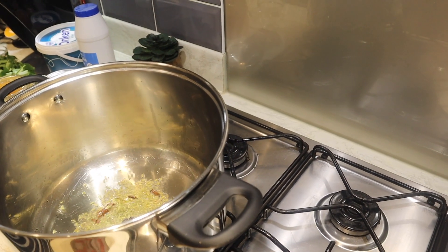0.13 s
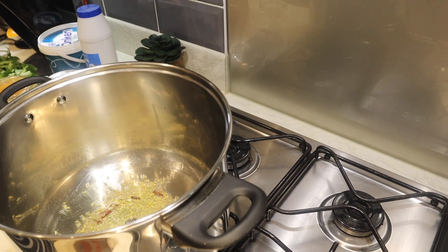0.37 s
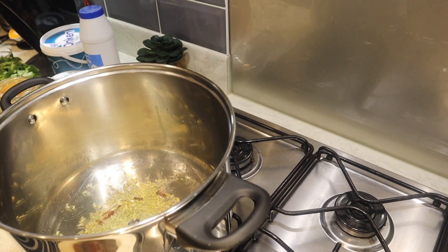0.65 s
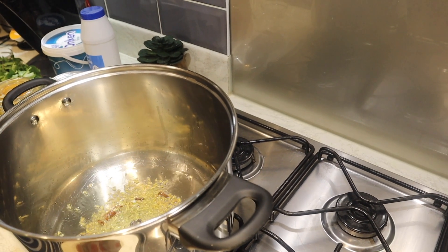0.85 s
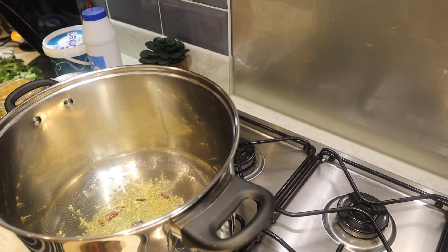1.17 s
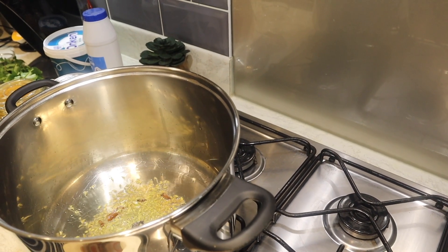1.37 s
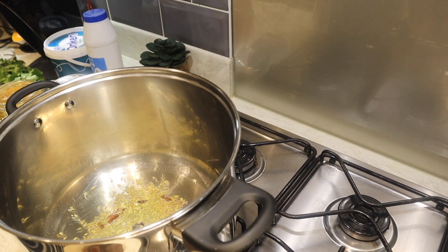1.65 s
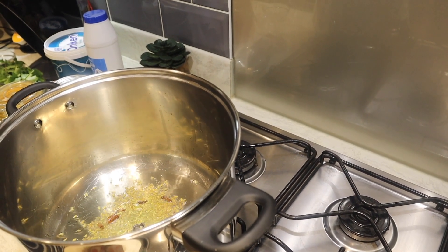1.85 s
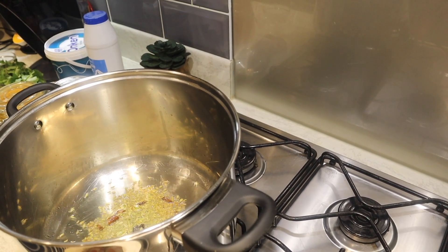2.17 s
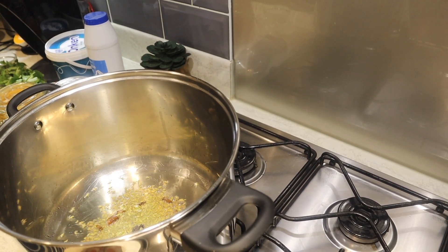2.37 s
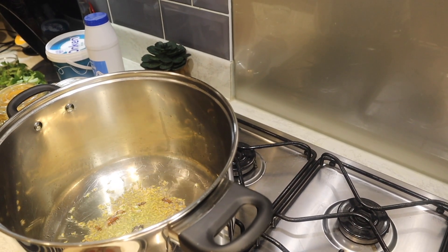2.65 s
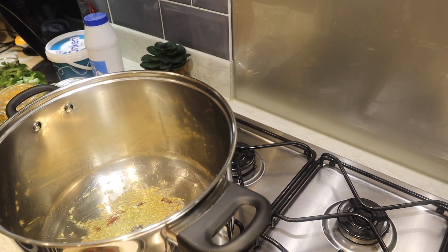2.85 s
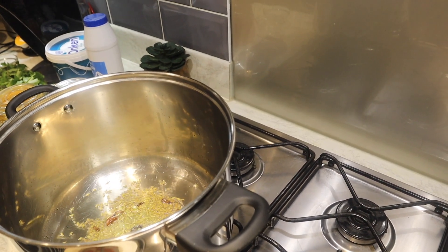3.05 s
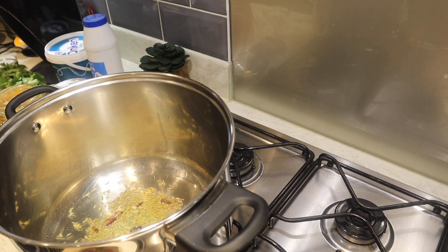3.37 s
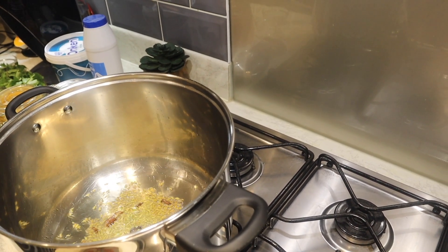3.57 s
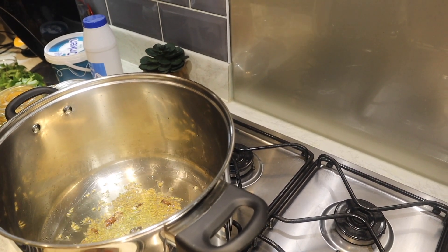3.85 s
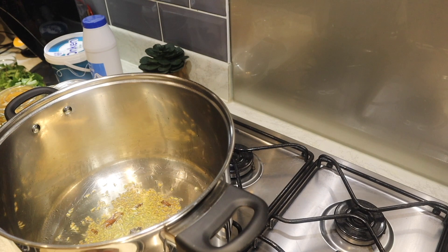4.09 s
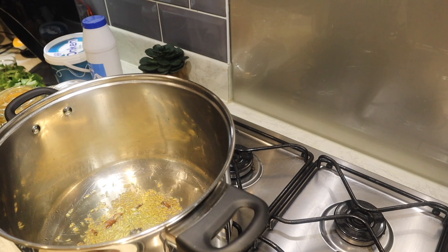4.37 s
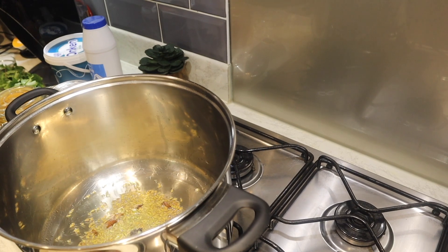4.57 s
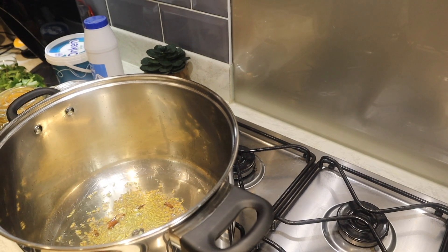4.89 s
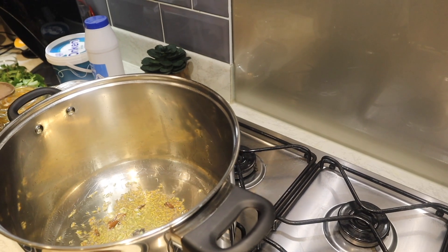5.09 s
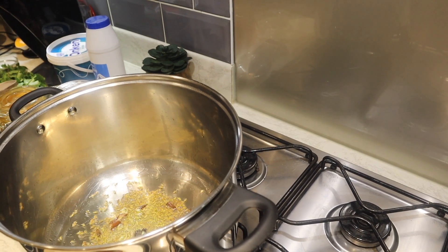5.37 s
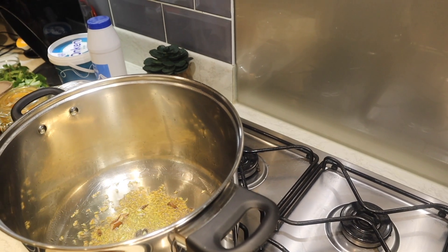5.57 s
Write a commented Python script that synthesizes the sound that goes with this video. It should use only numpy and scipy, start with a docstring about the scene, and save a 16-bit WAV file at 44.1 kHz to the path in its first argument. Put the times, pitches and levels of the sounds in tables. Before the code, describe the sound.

Close stereo capture of spices frying in a large steel pot: sharp bright snaps and softer bubble pops come irregularly throughout, over a thin sizzle and very low burner rush. Faint bumps occur in the first half second; after about four and a half seconds a metal object clinks, scuffs and knocks on the worktop. The home kitchen adds only a short tail.

```python
"""Hot oil sizzles finely over a burner's low rush, then steam bubbles pop and whole spices crackle in a steel pot.
Each burst is a snap of shaped noise with a puff of pressure; its ring is fading noise through the pot's resonances.
Faint scuffs and bumps come early; near the end a metal thing clinks and slides on the worktop.
Slides are gritty noise, clinks are dying sine modes and bumps are sagging tones with clatter.
A short kitchen tail surrounds it all but sizzle and burner; a close pair of microphone ports sets the stereo."""
import sys
import numpy as np
from scipy import signal
from scipy.fft import rfft, irfft, next_fast_len
from scipy.io import wavfile
from scipy.ndimage import uniform_filter1d

SR = 44100
rng = np.random.default_rng(int(sys.argv[2]) if len(sys.argv) > 2 else 0)


def to_wav(sig):
    """Store sig (one row per channel, or 1-D mono) as 16-bit WAV at the path in sys.argv[1].

    Samples outside -1..1 are clipped; the rate is SR.
    """
    pcm = np.clip(np.atleast_2d(sig), -1, 1) * 32767
    pcm = np.round(pcm).astype(np.int16)
    wavfile.write(sys.argv[1], SR, pcm.T)  # frames by channels


N = 252693

# seeds cracking open: (t/s, relative snap level/dB, f/Hz of the lifted pitch,
#                       pot ring relative to the snap/dB, relative puff level/dB)
CRACKS = [(0.122, -31, 12200, 7, -62), (0.1656, -22, 13000, -1, -57), (0.179, -17, 13300, -5.5, -35),
          (0.3012, -25.5, 13200, 7.5, -38.5), (0.504, -18, 6900, -17, -58),
          (0.5631, -6.5, 8300, -4.5, -27.5), (0.5907, -10.5, 9400, -9, -47), (0.6195, -8, 5950, -17, -17.5),
          (0.889, -10.5, 11500, -6.5, -31), (1.1193, -17, 13700, -6.5, -58),
          (1.146, -12.5, 12700, -28, -30.5), (1.331, -16, 14000, -7.5, -41), (1.375, -20, 13800, -4, -45),
          (1.5155, -17.5, 1360, -29, -27), (1.9085, -10.5, 14400, -1, -32),
          (1.9564, -9.5, 3920, -16.5, -16), (2.153, -30, 13200, 1.5, -40), (2.261, -20.5, 13300, 0.5, -51),
          (2.319, -18.5, 10900, -6, -53), (2.324, -14.5, 12400, -19, -29.5), (2.4, -26.5, 7900, -2, -48),
          (2.4242, -20.5, 7400, -10, -41), (2.454, -23, 12500, 4.5, -53), (2.563, -3, 10300, -12.5, -16),
          (2.5826, -17, 13000, -28, -17), (2.6063, -18.5, 1960, -12, -30), (2.8182, -32, 11700, -2, -55),
          (2.8697, -15.5, 12700, -27, -64), (2.962, -10, 5700, -23, -13), (3.036, -16.5, 10700, 1, -58),
          (3.1663, -23, 9100, -3, -66), (3.425, -33.5, 13000, 2.5, -41.5), (3.8114, -24, 13500, 2, -53),
          (4.1873, -14.5, 10800, -4.5, -49), (4.2368, -19.5, 12800, -2.5, -38),
          (4.5026, -14, 12700, 4.5, -28), (4.734, -30, 13000, 9.5, -37), (4.8407, -10.5, 11300, -2, -59),
          (4.942, -22.5, 13100, 4.5, -57), (5.045, -12.5, 14500, 0, -26.5), (5.1135, -15, 11700, -14, -42),
          (5.1151, -5.5, 11500, -15, -17.5), (5.2537, -12, 3270, -4.5, -23),
          (5.4679, -15, 12800, -3.5, -53), (5.664, -20.5, 9100, 6, -37), (5.7177, -14, 13000, -0.5, -22.5)]
# steam bubbles bursting in the oil: (t/s, relative snap level/dB, pitch f/Hz, lift at that pitch/dB,
#                                     pot ring relative to the snap/dB)
BUBBLES = [(0.0455, -32, 3220, 30, 2.5), (0.06, -27.5, 8850, 25, 1), (0.23, -14.5, 3780, 12, -3.5),
           (0.2459, -18.5, 3630, 21, -0.5), (0.4612, -27, 2320, 1, -1), (0.477, -24, 2030, 4.5, -0.5),
           (0.7496, -37, 3270, -7, 2), (0.7612, -27.5, 3400, 20, -1), (0.7765, -25.5, 4970, 20, 6.5),
           (0.8214, -24.5, 3700, 9, 3), (0.8612, -30.5, 8000, 12, 10), (0.8686, -15, 3750, 13, -9.5),
           (0.9306, -20.5, 8260, 15, -3), (0.9547, -21.5, 3100, 5, -3), (1.035, -34.5, 3050, -4, 7),
           (1.0554, -21.5, 2450, 5.5, 1), (1.0826, -35, 10000, 17, -1), (1.1679, -30, 3080, 1, 3.5),
           (1.2359, -25.5, 2400, 4, 0.5), (1.2529, -14.5, 3640, 13, 1.5), (1.2579, -12, 4800, 15.5, -3),
           (1.3038, -27, 6600, -2.5, 2.5), (1.309, -15, 5860, 31, -9), (1.4158, -21.5, 6950, 4, 4),
           (1.427, -8.5, 3860, 18.5, -17), (1.4657, -30, 7540, 8, 3.5), (1.497, -35, 4800, 19, 8),
           (1.522, -27.5, 3920, 9, 4.5), (1.5905, -22, 3670, 16, 0), (1.6032, -25, 5740, 15, 1),
           (1.6266, -21.5, 6760, 12, -4), (1.6792, -22.5, 7500, 34, -10), (1.757, -35, 7060, 32, 0),
           (1.791, -39, 3270, 2, 1), (1.803, -36, 6370, 7, 9), (1.8157, -25, 5150, 3.5, 8),
           (1.87, -25, 2000, 0, 1), (1.8896, -25.5, 4770, 10, 1), (1.931, -24, 2330, 37, -21),
           (2.023, -20, 2350, 5.5, -4), (2.0522, -28, 3650, 24, 3.5), (2.065, -34, 3420, 1, 11.5),
           (2.1921, -20, 4070, 17, -18), (2.2391, -22.5, 2580, 1.5, 3), (2.3148, -35, 3300, -9, 9),
           (2.5145, -32.5, 4300, 6, 2.5), (2.5425, -21.5, 3080, 3, 3), (2.615, -25, 3100, 45, 0.5),
           (2.6963, -23.5, 7060, 19, -3.5), (2.7215, -28.5, 3120, 3, -3), (2.738, -39, 3420, -4, 4),
           (2.8512, -35.5, 2000, -2, 10), (2.92, -26.5, 9500, 15, -11), (2.9956, -14, 3250, 11.5, -2),
           (3.058, -19.5, 3700, 23, -1.5), (3.109, -30.5, 4460, 14, 9.5), (3.2822, -19.5, 4650, 11.5, -0.5),
           (3.2947, -22, 5500, 8, -1.5), (3.3223, -25, 1990, 1.5, 0.5), (3.486, -32, 4300, 18, 4.5),
           (3.52, -33, 2090, 6, 8.5), (3.556, -37, 2760, -1, 6), (3.578, -28.5, 5200, 13, 6.5),
           (3.6292, -39, 5000, 5, 4), (3.637, -12, 4360, 11, -5), (3.6475, -23, 6150, -9, -0.5),
           (3.6533, -18, 5260, 17, 2), (3.8235, -26.5, 5650, 8, 3), (3.8947, -35.5, 6900, 6, 0),
           (3.958, -33, 10000, 17, 0), (4.0065, -31, 2330, 6, 4), (4.042, -22, 5000, 7.5, -3),
           (4.0689, -20.5, 1910, 5, 0.5), (4.1023, -16.5, 8600, 8.5, -2.5), (4.1751, -31, 2930, -11, 1),
           (4.3116, -20.5, 5440, 14, 1.5), (4.3312, -20, 2070, -5.5, 5), (4.3435, -25, 5100, 17, -1),
           (4.4493, -26.5, 6600, 11, 7), (4.778, -23.5, 2000, 3, -0.5), (4.8096, -22, 4400, -1, -19),
           (4.8205, -32, 4480, 34, 3), (4.8967, -32, 8500, 24, 5), (4.9535, -22.5, 3400, 9, 7),
           (4.972, -26.5, 4870, 20, 7.5), (4.995, -13, 4760, 15, -1), (5.0832, -17, 1980, 4.5, 3),
           (5.2134, -28, 3160, 11, 6), (5.3361, -22.5, 3350, 9, 4), (5.378, -22.5, 6900, 11, -5),
           (5.409, -20.5, 4330, 16, 2.5), (5.5017, -26.5, 3910, 6, 3), (5.518, -25, 1990, 6, -0.5),
           (5.4621, -27, 8440, 6, -1), (5.5484, -20, 7300, 5, -4.5), (5.5735, -33.5, 3400, 1, 8.5),
           (5.5984, -24, 3360, 13.5, 9.5), (5.6256, -33, 5170, -4, 5), (5.695, -15.5, 3650, 16.5, 4.5)]
# spectrum of a snap before its pitch is lifted: (f/Hz, relative level/dB)
SNAP_SPECTRUM = [(100, -24), (400, -27), (900, -1.5), (1250, -9), (2000, -3), (3000, 2), (4200, 3),
                 (6000, 1), (8700, 2.5), (11300, 6), (12700, 4), (14000, -5.5), (16000, 1)]
# spectrum of the ring before the pot's resonances: (f/Hz, relative level/dB)
RING_SPECTRUM = [(100, -38), (220, -23.5), (400, -17), (700, -13), (1300, -15), (2000, -6.5), (3000, 1.5),
                 (4200, -2), (6000, 2.5), (8700, -1.5), (11300, 4.5), (12700, -2), (14000, -14),
                 (16000, -50)]
# resonances of the steel pot: (f/Hz, width/Hz, lift/dB)
POT_MODES = [(355.4, 91, 15.5), (411.6, 74, 16), (952, 46, 22.5), (1488, 76, 18.5), (1792, 144, 13.5),
             (2305, 110, 6.5), (3990, 130, 3.5)]
# strokes of things over the worktop: (t/s, relative level/dB, hold/s, decay time constant/s,
#                                      brightness above 1 kHz/dB per octave)
SLIDES = [(0.454, -48, 0.03, .012, -1), (2.109, -50.5, 0.047, 0.034, -13.5),
          (2.854, -47.5, 0.015, 0.043, -7), (3.189, -48.5, 0.072, 0.034, -1),
          (4.421, -37.5, 0.015, 0.029, -4), (4.513, -32.5, 0.027, 0.016, 0),
          (4.531, -27, 0.015, 0.02, -1.5), (4.776, -37, 0.014, 0.031, -4), (4.948, -36, 0.016, 0.023, -24),
          (5.158, -22.5, 0.012, 0.031, 1.5), (5.211, -29, 0.014, 0.034, -2)]
# spectrum of rubbing: (f/Hz, relative level/dB)
SLIDE_SPECTRUM = [(80, -34), (250, -9), (700, -13.5), (1200, -2), (2200, -0.5), (3400, 4), (5000, -2),
                  (7000, -7), (10000, -9), (15000, -23)]
# resonances of the slid thing: (f/Hz, width/Hz, lift/dB)
SLID_THING_MODES = [(844, 120, 8.7), (1210, 59, 7.4), (1310, 76, 10.4), (1790, 120, 9), (2260, 150, 9.7),
                    (2450, 70, 11), (3306, 41, 12), (4240, 66, 6.1), (4970, 59, 12), (6100, 340, 8.5),
                    (7180, 86, 10), (9000, 72, 23)]
# the metal thing touching: (t/s, relative level/dB, brightness/dB per octave)
CLINKS = [(4.423, -33, -5), (4.537, -25, -2), (4.953, -24, -9), (5.162, -21, -2), (5.181, -31, 3.5),
          (5.219, -40, 8)]
# its struck modes: (f/Hz, level before brightness/dB, t60/s)
CLINK_MODES = [(956, -16, 0.21), (1166, -16.5, 0.24), (1740, -5, 0.17), (2200, -2, 0.081),
               (2243, -1, 0.065), (3280, -2.5, 0.23), (4177, -14, 0.12), (4960, -13, 0.17),
               (6040, -18, 0.08), (7070, -19, 0.08), (8830, -11, 0.11)]
# dull bumps: (t/s, relative level/dB, starting f/Hz, length/s, decay time constant/s, share of clatter 0-1)
BUMPS = [(0.372, -47.5, 124, 0.034, 0.016, 0.24), (0.414, -47, 82.5, 0.032, 0.025, 0.6),
         (0.474, -40.5, 134, 0.035, 0.012, 0.14), (0.514, -43.5, 127, 0.031, 0.019, 0.4),
         (4.57, -38.5, 209, 0.0099, 0.039, 0.86), (4.622, -44.5, 240, 0.011, 0.017, 0.9),
         (4.672, -45.5, 184, 0.014, 0.039, 0.67), (4.744, -32.5, 197, 0.024, 0.011, 0.28),
         (4.774, -39.5, 89, 0.017, 0.063, 0.94), (4.955, -41, 229, 0.032, 0.048, 0.99),
         (4.993, -41.5, 188, 0.055, 0.028, 0.96), (5.232, -28, 150, 0.011, 0.021, 1),
         (5.249, -28, 138, 0.0095, 0.043, 0.96)]
# spectrum of the clatter in a bump: (f/Hz, relative level/dB)
CLATTER_SPECTRUM = [(60, -6), (130, 3), (450, 2.5), (900, 4.5), (1500, -3.5), (3000, -4), (8000, -40)]
# resonances of the knocked worktop: (f/Hz, width/Hz, lift/dB)
WORKTOP_MODES = [(263, 34, 4), (398, 45, 12.5), (675, 33, 3.5), (896, 85, 6), (1180, 47, 6.5),
                 (1600, 80, 6), (1986, 72, 8)]
# spectrum of the fine sizzle: (f/Hz, relative level/dB)
SIZZLE_SPECTRUM = [(1000, -0.5), (1400, 2), (2000, 1), (3200, 11.5), (4500, 10), (6500, 11.5), (8500, 6.5),
                   (11000, 9), (12300, 9), (14000, 0), (16000, -49)]
# how hard the oil sizzles: (t/s, relative level/dB)
HEAT = [(0.0, -36), (0.12, -39.5), (0.8, -39.5), (1.1, -40), (1.4, -45), (1.9, -39.5), (2.6, -43.5),
        (2.8, -45.5), (3.2, -45.5), (3.45, -44), (3.61, -36.5), (3.76, -44.5), (3.95, -42), (4.4, -40.5),
        (4.9, -37.5), (5.25, -50), (5.45, -37), (5.73, -35.5)]
# spectrum of the burner's rush: (f/Hz, relative level/dB)
BURNER_SPECTRUM = [(25, 2), (70, 5), (130, 5.5), (230, -2), (380, 1.5), (600, -5), (950, 4.5), (1300, -1.5),
                   (2500, 3), (5000, -30), (12000, -23), (16000, -60)]
# decay of the kitchen's tail: (f/Hz, t60/s)
KITCHEN_DECAY = [(100, 0.037), (1000, 0.066), (5000, 0.22), (14000, 0.0065)]
# phase between the ports: (f/Hz, lead of the left/rad)
PORT_PHASE = [(100, 0.5), (400, 0.72), (1000, 0.52), (1800, 0.2), (2500, 1.74), (4300, 2), (7000, 4),
              (9500, 4), (16000, 3.5)]
# likeness of the two ports: (f/Hz, likeness 0-1)
PORT_LIKENESS = [(25, 1), (90, 1), (300, 1), (700, 0.98), (1500, 0.25), (3000, 0.97), (6000, 0.41),
                 (9000, 1), (13000, 1)]
# balance of the ports: (f/Hz, left minus right level/dB)
PORT_BALANCE = [(60, -0.5), (400, 0.34), (1000, 1.4), (2000, -1.5), (4000, 1.5), (8000, 1.1),
                (13000, -0.43)]

LEAD_S = 58 / SR  # a snap's sound starts this far ahead of its listed time
WALL_S, WALL_DB = 0.0019, -17  # base delay and level of the pot-wall echoes, both varied per echo
BUBBLE_PUSH_DB = -30  # a bubble's puff relative to its snap, before the port gains
EDGE_HZ = 16100  # top of the recorded band


def cracks(tone_db=7.0, burst_s=0.00012):
    """Seeds split with a dry, broad snap and a puff of steam."""
    out = np.zeros((2, N))
    for s, snap_db, hz, ring_db, push_db in CRACKS:
        add(out, s - LEAD_S, pop(snap_db, hz, tone_db, ring_db, burst_s))
        add(out, s, push(push_db))
    return out


def bubbles(cycles=1.55, puff_s=0.0009):
    """Steam bubbles burst: the lower the pitch, the longer the burst takes to die."""
    out = np.zeros((2, N))
    for s, snap_db, hz, tone_db, ring_db in BUBBLES:
        add(out, s - LEAD_S, pop(snap_db, hz, tone_db, ring_db, burst_s=cycles / hz))
        add(out, s, push(snap_db + BUBBLE_PUSH_DB, puff_s))
    return out


def pop(snap_db, hz, tone_db, ring_db, burst_s, octaves=0.8, ring_tone=0.99, fast_t60=0.039,
        slow_t60=0.18, slow_db=-7, top_hz=11500, top_db=14, echo_db=2.0):
    """A seed or bubble bursts in a brief snap, which then bounces around in the pot."""
    def pitch_lift(f):
        """Lifts the burst's pitch; lower-pitched bursts lose more of the very top."""
        lowness = np.clip(1 - hz / top_hz, 0, 1)
        top_cut = top_db * lowness * np.clip(f / top_hz - 1, 0, 1) * 4
        return tone_db * np.exp(-(np.log2((f + 1) / hz) / octaves) ** 2) - top_cut

    # snap: the phases of a dying noise burst on a designed spectrum
    f, t = bins(size=512), np.arange(512) / SR
    bursts = np.roll(rng.standard_normal((2, len(t))) * np.exp(-t / burst_s), 64, axis=1)
    snap_spectra = amp(read(SNAP_SPECTRUM, f) + pitch_lift(f)) * np.exp(1j * np.angle(rfft(bursts)))
    snap = unit(ports(*snap_spectra))

    # ring: begins 80 samples in and fades at two speeds
    f, t = bins(size=4096), np.maximum(np.arange(4096) - 80, 0) / SR
    fade = 1000 ** (-t / fast_t60) + amp(slow_db) * 1000 ** (-t / slow_t60)
    fade = fade * (1 - np.exp(-t * SR / 16))
    fade = fade * amp(echo_db * wobble(len(t), size=30))  # wall echoes arrive in clumps
    pot_db = lifts(varied(POT_MODES, shift=0.021, uneven_db=3.5), f)
    ring_colour_db = read(RING_SPECTRUM, f) + pot_db + ring_tone * pitch_lift(f)
    sound = amp(ring_db) * unit(noise(ring_colour_db) * fade)

    for delay, size in rng.random((3, 2)):  # the nearest walls return the snap itself
        add(sound, WALL_S * (.5 + 2 * delay), amp(WALL_DB) * (.5 + size) * snap)
    add(sound, 0, snap)
    return amp(snap_db) * np.sqrt(SR / 500) * sound


def push(db, width_s=0.00048, rise_s=0.000097, left_db=19, right_db=13):
    """The puff of steam from a burst: a quick rise of pressure and a shallow undershoot."""
    t = np.arange(SR // 80) / SR
    swing = np.gradient(t * np.exp(-t / width_s) * (1 - np.exp(-t / rise_s)))
    return amp(db) * unit(swing) * amp([[left_db], [right_db]])


def slides(rise_s=0.00066):
    """Things catch and slip over the worktop in gritty noise; the metal thing clinks where it touches."""
    out = np.zeros((2, N))
    f, t = bins(size=16384), np.arange(16384) / SR
    rise = 1 - np.exp(-t / rise_s)
    for s, db, length, dying, bright in SLIDES:
        stroke = rise * np.exp(-np.maximum(t - length, 0) / dying)
        body_db = lifts(varied(SLID_THING_MODES, shift=0.01, uneven_db=5.5), f)
        tilt_db = bright * np.log2(np.maximum(f, 1000))
        rub = grit(len(t)) * noise(read(SLIDE_SPECTRUM, f) + body_db + tilt_db)
        add(out, s, amp(db) * stroke * rub)
    for s, db, bright in CLINKS:
        add(out, s, amp(db) * rise * clink(bright, t))
    return out


def clink(bright, t, detune=0.011, chatter_db=3):
    """A few modes of metal, struck together; the grip shifts their pitch and the contact chatters."""
    out = np.zeros((2, len(t)))
    lowest_hz = CLINK_MODES[0][0]
    for (hz, db, t60), (turn, grip) in zip(CLINK_MODES, rng.random((len(CLINK_MODES), 2))):
        gripped_hz = hz * (1 + detune * (2 * grip - 1))
        port_lag = np.array([[0], [read(PORT_PHASE, hz)]])
        phase = 2 * np.pi * (gripped_hz * t + turn) - port_lag
        chatter = evened(amp(chatter_db * wobble(len(t), size=200)))
        level = amp(db + bright * np.log2(hz / lowest_hz))
        out += level * 1000 ** (-t / t60) * chatter * np.sin(phase)
    return out


def bumps(waver=0.046, sag=1.5, judder_db=4):
    """Dull knocks with an unsteady, sagging pitch; their clatter rings in the worktop."""
    out = np.zeros((2, N))
    f, t = bins(size=16384), np.arange(16384) / SR
    for s, db, hz, length, dying, clatter in BUMPS:
        swell = np.sin(np.pi / 2 * np.minimum(2 * t / length, 1))
        swell = swell * np.exp(-np.maximum(t - length * 0.97, 0) / dying)
        share = np.clip(clatter, 0, 1)
        pitch = hz * np.exp(-sag * t) * (1 + waver * wobble(len(t), size=300))
        boom = np.sqrt(2 * (1 - share ** 2)) * np.sin(2 * np.pi * np.cumsum(pitch) / SR)
        boom = boom * amp([[1], [-1.5]])  # gains in dB: left up 1, right down 1.5
        boom = boom * evened(amp(judder_db * wobble(len(t), size=300)))  # the thing judders
        clatter_noise = noise(read(CLATTER_SPECTRUM, f) + lifts(WORKTOP_MODES, f))
        rattle = grit(len(t), per_s=110, grain_s=0.0048, bed=0.72) * clatter_noise
        add(out, s, amp(db) * swell * (boom + share * rattle))
    return out


def grit(length, per_s=300, grain_s=0.0015, bed=0.54):
    """The strength of a rubbing contact: irregular catches over a smooth bed, rms one."""
    catches = (rng.random(length) < per_s / SR) * rng.uniform(0.34, 1, length)
    return evened(bed + signal.lfilter([1], [1, -np.exp(-1 / (grain_s * SR))], catches))


def sizzle(per_s=210, spread_db=5, ticks_db=-5.0, hiss_db=-6.0, tick_s=0.00063, ring_s=0.015,
           ring_db=0, tone_db=15, octaves=0.21):
    """Countless tiny bubbles: ticks of many pitches ringing in the pot, over a smooth hiss."""
    f, t = bins(size=2048), np.arange(2048) / SR
    ticks, pitches = np.zeros((2, N)), np.geomspace(2000, 11000, num=20)
    for hz in pitches:
        colour_db = read(SIZZLE_SPECTRUM, f) + tone_db * np.exp(-(np.log2((f + 1) / hz) / octaves) ** 2)
        tick = unit(noise(colour_db) * np.exp(-t / tick_s))
        ring = unit(noise(colour_db + lifts(POT_MODES, f)) * np.exp(-t / ring_s))
        strengths = amp(spread_db * np.minimum(rng.exponential(1, N), 2))
        train = (rng.random(N) < per_s / len(pitches) / SR) * strengths
        ticks += signal.oaconvolve(train[None], tick + amp(ring_db) * ring, axes=1)[:, :N]
    hiss = noise(read(SIZZLE_SPECTRUM, bins(next_fast_len(N // 2 + 1) * 2)))[:, :N]
    heat = amp(np.interp(np.arange(N) / SR, *np.transpose(HEAT)))
    return heat * (amp(ticks_db) * evened(ticks) + amp(hiss_db) * hiss)


def burner(db=-57.0, pot_share=0.19):
    """The steady rush of the gas flame, coloured by the pot above it."""
    f = bins(next_fast_len(N // 2 + 1) * 2)
    return amp(db) * noise(read(BURNER_SPECTRUM, f) + pot_share * lifts(POT_MODES, f))[:, :N]


def kitchen(x, delay_s=0.00029):
    """The tiled room's short tail of noise, each band dying at its own speed."""
    hz, t, z = signal.stft(rng.standard_normal((2, SR // 2)), SR, nperseg=256)
    dying = z * 1000 ** (-t / read(KITCHEN_DECAY, hz)[:, None])
    tail = signal.istft(dying, SR, nperseg=256)[1]
    onset = 1 - np.exp(-(np.arange(tail.shape[1]) / SR / delay_s) ** 2)
    tail = unit(tail * onset)
    size = 2 * next_fast_len(N // 2 + SR // 2)
    return ports(*(rfft(x[0], size) * rfft(tail, size)))[:, :N]


def ports(first, second):
    """Two unrelated spectra become the partly alike left and right of the port pair."""
    size = 2 * (len(first) - 1)
    hz = bins(size)
    same = np.clip(read(PORT_LIKENESS, hz), 0, 1)
    right = same * first + np.sqrt(1 - same ** 2) * second
    lean = amp(read(PORT_BALANCE, hz) / 2)
    lag = np.exp(-1j * read(PORT_PHASE, hz))
    return irfft(np.array([first * lean, right / lean * lag]), size)


def noise(colour_db):
    """Stereo noise with a given spectrum, rms one."""
    a, b, c, d = rng.standard_normal((4, len(colour_db)))
    return evened(ports((a + 1j * b) * amp(colour_db), (c + 1j * d) * amp(colour_db)))


def lifts(modes, hz):
    """The dB that a set of resonances adds."""
    return sum(db / (1 + (2 * (hz - f) / width) ** 2) for f, width, db in modes)


def varied(modes, shift, uneven_db):
    """Where a thing is touched decides how strongly each resonance answers, and shifts it a little."""
    draws = rng.uniform(-0.9, 1, (len(modes), 2))
    return [(f * (1 + shift * a), width, db + uneven_db * b) for (f, width, db), (a, b) in zip(modes, draws)]


def wobble(length, size):
    """Random unevenness of rms one, smoothed over a number of samples."""
    return evened(uniform_filter1d(rng.standard_normal(length), size=size))


def amp(db):
    """Decibels to gain."""
    return 10 ** (np.asarray(db) / 20)


def evened(x):
    """Scales to an rms of one."""
    return x / np.sqrt(np.mean(x ** 2) + 1e-20)


def unit(x):
    """Scales to a mean energy of one per channel."""
    return evened(x) / np.sqrt(x.shape[-1])


def bins(size):
    """Frequencies of a spectrum of that many samples."""
    return np.fft.rfftfreq(size, 1 / SR)


def read(points, hz):
    """Joins points by straight lines over log frequency."""
    f, value = np.transpose(points)
    return np.interp(np.log(hz + 1), np.log(f + 1), value)


def add(mix, s, sound):
    """Mixes a stereo sound in at a time."""
    part = mix[:, max(round(s * SR), 0):][:, :sound.shape[1]]
    part += sound[:, :part.shape[1]]


def scene():
    """The pot in front, the worktop with more of the room around it, sizzle and burner beneath."""
    pot, handling = cracks() + bubbles(), slides() + bumps()
    near = pot + amp(-15.5) * kitchen(pot)
    worktop = handling + amp(-5.0) * kitchen(handling)
    return near + worktop + sizzle() + burner()


def record(dry, low_cut_hz=47):
    """Peaks past full scale overload the microphones; the recorder sheds the deepest bass and the very top."""
    clipped = np.clip(dry, -1, 1)
    low_cut = signal.butter(2, low_cut_hz, "highpass", fs=SR, output="sos")
    lean = signal.sosfilt(low_cut, clipped)
    top_cut = signal.firwin(255, EDGE_HZ, window=("kaiser", 8), fs=SR)
    return signal.oaconvolve(lean, top_cut[None], "same")


dry = scene()
out = record(dry)
to_wav(out)
```